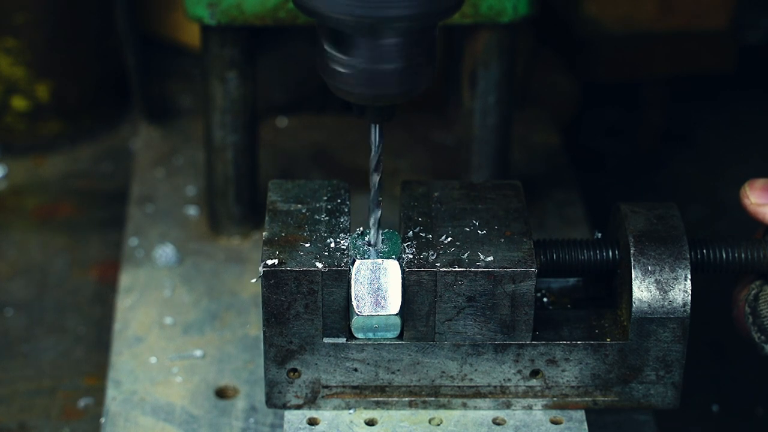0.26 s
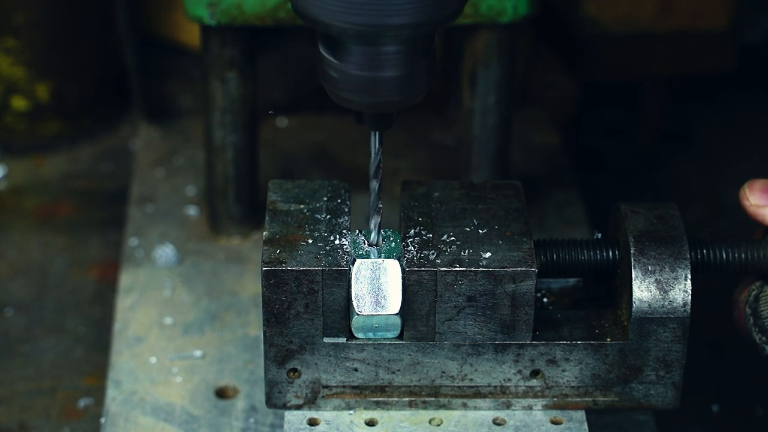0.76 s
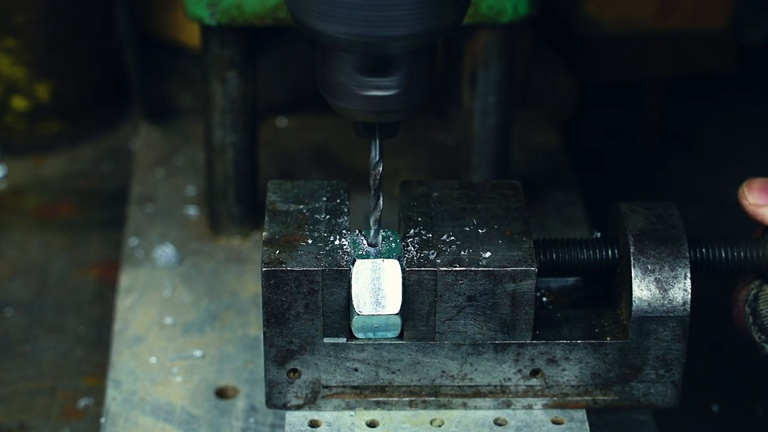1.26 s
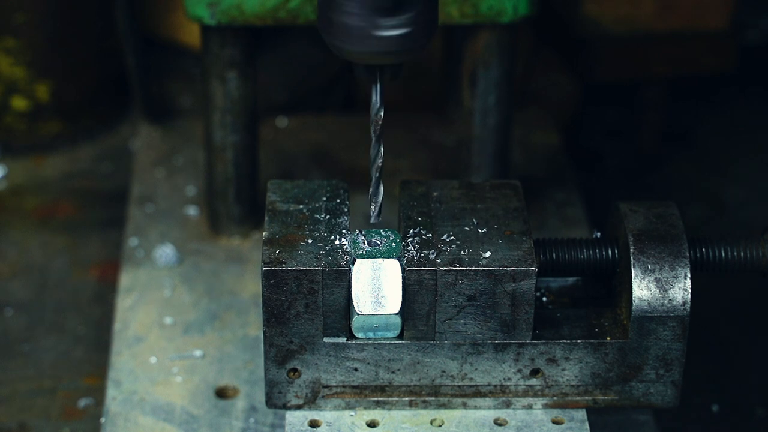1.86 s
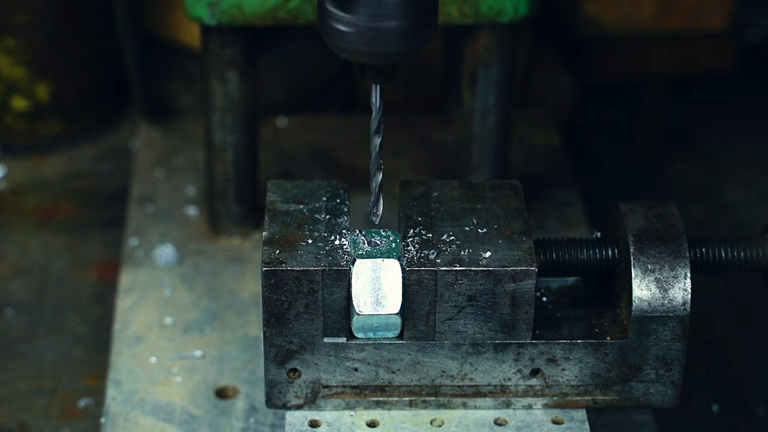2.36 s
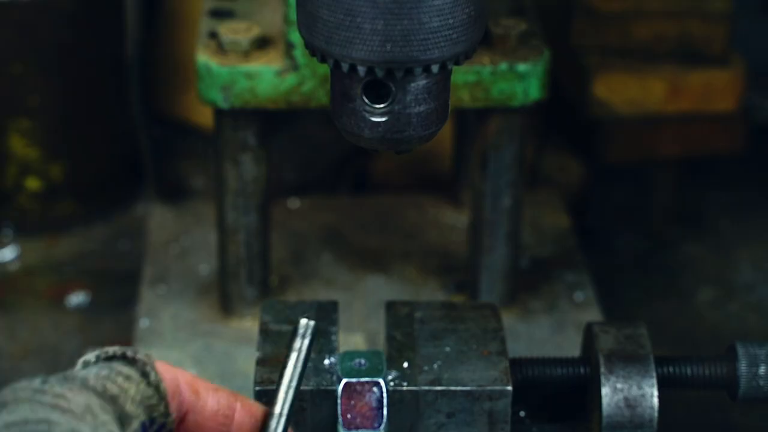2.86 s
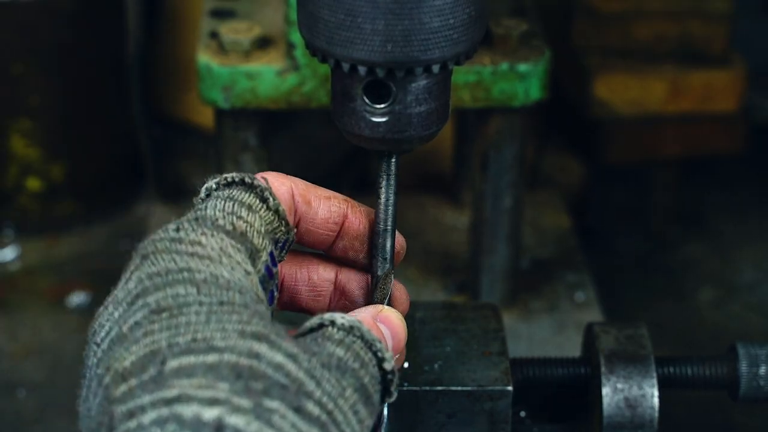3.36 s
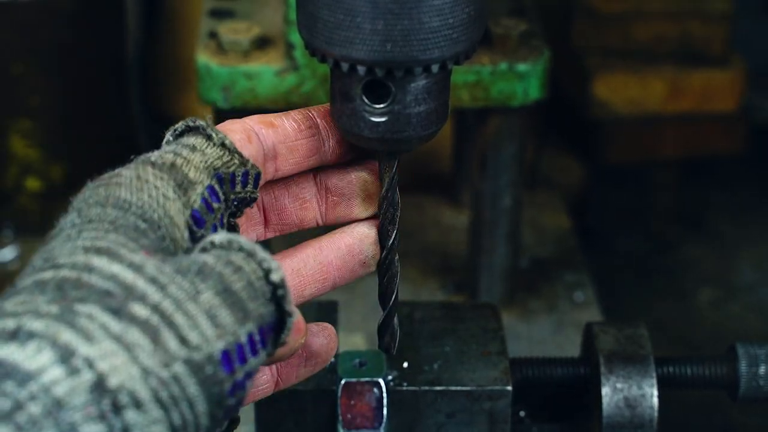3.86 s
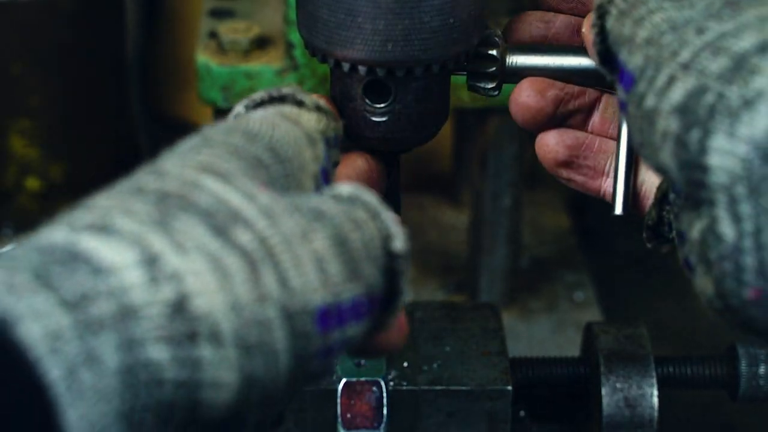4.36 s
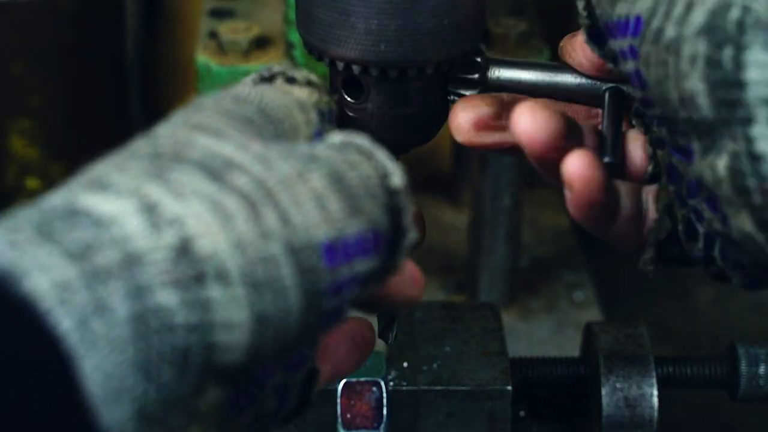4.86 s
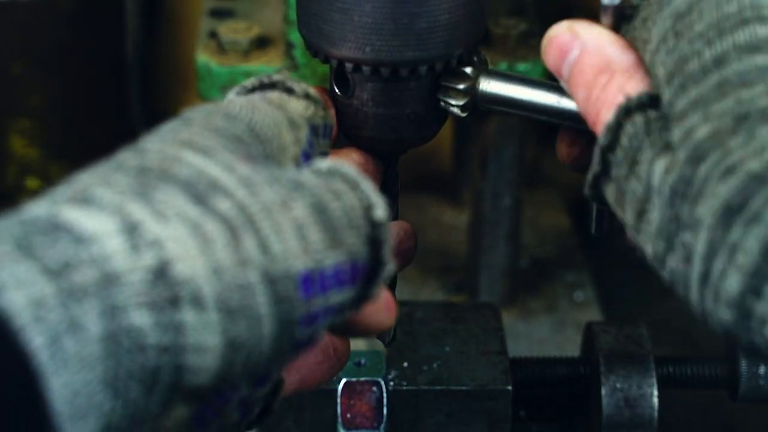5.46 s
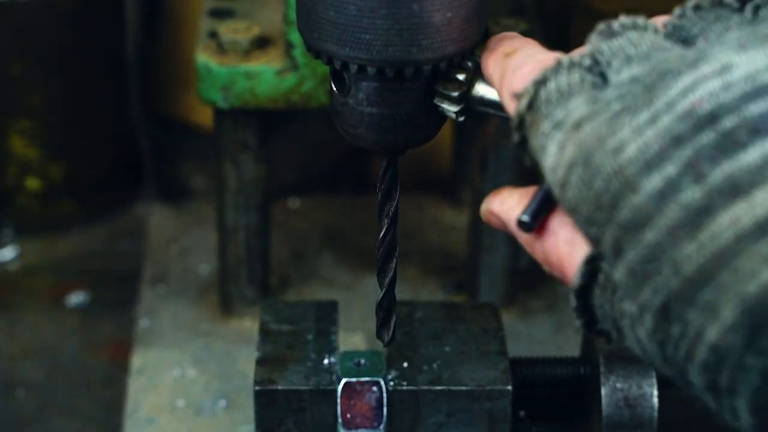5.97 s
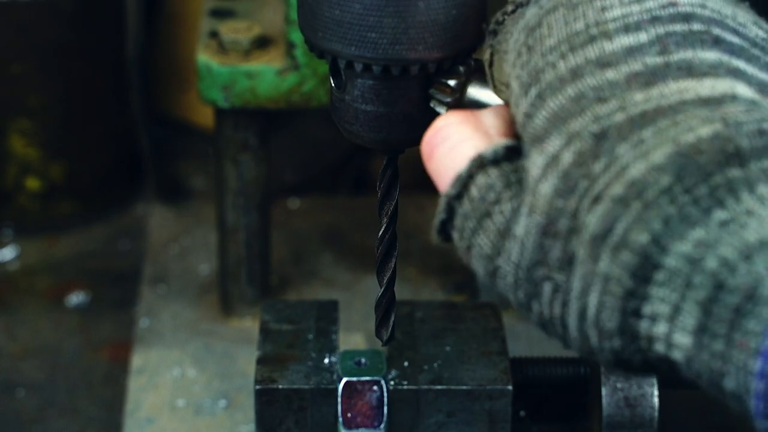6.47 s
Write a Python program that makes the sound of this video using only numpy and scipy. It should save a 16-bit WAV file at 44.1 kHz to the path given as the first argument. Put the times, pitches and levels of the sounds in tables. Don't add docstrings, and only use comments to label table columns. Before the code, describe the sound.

A drill press grinds harshly through a steel nut, chattering and squeaking, then cuts off abruptly to quiet metal ticks, scrapes and key clinks.

```python
import sys
import numpy as np
from scipy import signal
from scipy.fft import rfft, irfft, next_fast_len
from scipy.io import wavfile
from scipy.ndimage import uniform_filter1d, map_coordinates

SR = 44100
rng = np.random.default_rng(int(sys.argv[2]) if len(sys.argv) > 2 else 0)


def to_wav(sig):
    pcm = np.clip(np.atleast_2d(sig), -1, 1) * 32767
    pcm = np.round(pcm).astype(np.int16)
    wavfile.write(sys.argv[1], SR, pcm.T)


def ratio(d):
    e = np.asarray(d, float) / 20
    return 10 ** e


N = 295896
TIME = np.arange(N) / SR
SCENE_CHANGE = 2.7723
RUNNING = int(2.8 * SR)
TURNS, FIRST_TURN = 37.93, 0.387
BITE_START, BITE_END = 0.24, 0.73
BREAK_THROUGH, CLEAR = 0.755, 1.707

# (frequency [Hz], level per Hz [dB])
COLUMN_BITING = [(24, -73), (40, -67), (287, -18.5), (413, -10.5), (503, -16), (586, -3), (758, -6.5),
                 (1040, 2), (1500, -1.5), (1950, -7.5), (3300, -120)]
VISE_BITING = [(880, -34), (1500, -5.5), (2730, -1.5), (3630, -5.5), (4310, -3), (5200, -4), (6760, -48),
               (11400, -120)]
BIT_BITING = [(5290, -42), (9000, -24), (9660, -4), (11400, 2), (12800, 0), (13600, 9), (14100, 11),
              (15800, -6.5)]
# (frequency [Hz], level per Hz [dB])
VISE_BACKING = [(880, -34), (1500, -6.5), (1820, -5), (2060, -6.5), (3170, 1.5), (4050, -2.5), (5200, -5),
                (6760, -51), (11400, -120)]
BIT_BACKING = [(5290, -59), (9000, -10.5), (9660, -5.5), (10900, -4.5), (12800, -3.5), (13700, -3),
               (14300, 2.5), (14900, -0.5), (15800, -26)]
# (frequency [Hz], level per Hz [dB])
COLUMN_FREE = [(24, -81), (40, -80), (319, -16), (355, -20.5), (439, -14.5), (527, -14), (622, -2),
               (770, -7), (1210, 2.5), (1500, -1.5), (1950, -32), (3300, -120)]
VISE_FREE = [(880, -30), (1500, -4), (2330, 1), (2660, 2), (3190, -2), (5200, 0), (6760, -11.5),
             (11400, -120)]
QUILL = [(3060, -55), (5200, -6.5), (5730, 1), (6050, 0), (7090, -2.5), (9000, -9.5), (11700, -18.5),
         (19800, -120)]
BIT_FREE = [(7000, -42), (9300, -3), (12900, -4), (14000, -3), (14500, -1.5), (15800, -6.5)]
# (frequency [Hz], width [Hz], boost [dB])
RESONANCES = [(189.6, 21, 12.5), (418, 13, 16), (461, 14, 16), (603, 350, 2.5), (1302, 49, 6.5),
              (1738, 120, 10.5), (2330, 140, 10), (3087, 104, 8.5), (3285, 88, 10), (3980, 65, 10.5),
              (4180, 75, 2.5), (4570, 220, 10), (5650, 45, 4.5), (5920, 114, 9), (6100, 53, 7.5),
              (6600, 49, 5), (6440, 40, 2.5), (7640, 100, 2), (7900, 42, 8.5), (8800, 78, 10),
              (10700, 360, 5.5), (11900, 120, 4), (14400, 220, 8)]
# (frequency [Hz], level [dB])
MOTOR = [(199.2, -71), (414.5, -65), (452.2, -75), (625, -60), (683.7, -48)]
# (time [s], loudness [dB])
FEED = [
    (0, -21),
    (.33, -21.5),
    (.72, -21.5),
    (1.04, -20),
    (1.4, -22.5),
    (1.44, -22.5),
    (2.24, -18.5),
    (2.76, -21.5),
]
# (column [dB], vise [dB], quill [dB], bit [dB])
BITING_DB = [-9.5, -4, -4, -4.5]
BACKING_DB = [-14.5, -5.5, -5.5, -4]
FREE_DB = [-14.5, -4, -5.5, -7.5]
# (column [dB], vise [dB], quill [dB], bit [dB])
RUBBING_DB = [-1.4, -0.054, -1.8, 1]
# (time [s], half length [s], column boost [dB], vise boost [dB])
SURGES = [
    (0.022, 0.022, 1, 3),
    (0.14, .04, 2, 1),
    (0.209, 0.016, 6, 3),
    (0.344, 0.042, 5.5, 5),
    (0.504, 0.021, 3, 3.5),
    (0.63, .05, 2.5, 1),
    (0.726, 0.051, 4, 3.5),
]
# (start [s], end [s], level [dB], lag [s])
RUBS = [
    (0.785, 1.079, -12, .004),
    (1.24, 1.415, -11, .001),
]
# (first pitch [Hz], last pitch [Hz], level [dB])
RUB_VOICES = [
    (6500, 7200, 1.5),
    (3900, 4100, 0),
    (10800, 11300, -4),
]
QUARTERS_DB = [-13, 0, -1, -5]
# (time [s], peak level [dB])
KNOCKS = [(0.3067, -12), (0.3204, -16), (0.3331, -12), (0.3464, -17), (0.3735, -14), (0.386, -11),
          (0.3994, -18), (0.4125, -13), (0.4254, -19), (0.4389, -14), (0.4529, -13), (0.4654, -13),
          (0.4793, -16), (0.4914, -14), (0.5057, -12), (0.5184, -12), (0.5317, -13), (0.5434, -12),
          (0.5574, -18), (0.5696, -11), (0.5834, -18), (0.5965, -10), (0.6094, -15), (0.623, -11),
          (0.6354, -16), (0.6489, -13), (0.6614, -12), (0.6759, -11), (0.6884, -14), (0.7014, -12),
          (0.7144, -14)]
# (time [s], peak level [dB], pitch [Hz])
SQUEAKS = [(0.7581, -4, 10700), (0.8116, -3, 14400), (0.837, -7, 13900), (0.862, -12, 14400),
           (0.892, -4, 12900), (0.9208, -8, 14400), (1.061, -9, 14400), (1.1214, -5, 14100),
           (1.226, -10, 11100), (1.247, -8, 14400), (1.665, -10, 14360), (2.1635, -8, 14700),
           (2.4319, -7, 14600), (2.6499, -7, 14800)]
# (time [s], peak level [dB], pitch [Hz])
CHIPS = [(0.057, -8.5, 1710), (0.3212, -12, 2380), (0.455, -8, 2800), (0.493, -7, 3200), (0.5072, -4, 3070),
         (.5816, -18, 3060), (.845, -8, 2800), (.9283, -17, 3070), (1.033, -19, 3320), (1.117, -5, 3020),
         (2.6933, -13, 3300), (1.398, -11, 3820), (1.576, -8, 2990), (1.613, -6.5, 3110),
         (1.6633, -6.5, 3200), (2.108, -12, 2330), (2.286, -2.5, 3100), (2.3432, -5, 3870),
         (2.38, -4.5, 4180), (2.432, -5, 3200), (2.4663, -14, 2530), (2.6484, -6, 2330)]
# (time [s], peak level [dB], pitch [Hz])
THUDS = [
    (1.6652, -24.5, 1244),
    (1.8376, -19, 1207),
    (2.107, -22.5, 1245),
    (2.2358, -21.5, 1275),
    (2.3442, -21, 1205),
]
# (time [s], half length [s], level [dB], pitch [Hz], width [Hz])
DIGS = [
    (.04, .035, -25.5, 1670, 900),
    (.2, 0.026, -26, 2520, 1500),
    (.335, 0.017, -23.5, 2220, 900),
    (.735, 0.035, -24.5, 3020, 900),
    (.96, 0.052, -30, 4070, 500),
    (1.0, .06, -31, 14000, 1200),
    (1.27, 0.043, -35, 14300, 1200),
    (1.34, 0.075, -31, 11000, 1500),
]
# (frequency [Hz], likeness [-1 to 1])
DRILLING_ALIKE = [(60, 0.78), (180, 1.0), (550, 1), (1650, 0.85), (4970, 0.44), (9000, 0.3), (15000, 0.21)]
ROOM_ALIKE = [(60, 1), (240, 1), (950, 0.36), (3770, -0.17), (15000, -0.063)]
# (frequency [Hz], left over right [dB])
LEAN = [(60, -2), (180, 3), (550, 0), (1650, -1.5), (4970, -0.5), (9000, 1), (12000, -3), (15000, -6.5)]

# (frequency [Hz], level [dB], time to fall 60 dB [s])
CHUCK = [(2310, -2, 0.064), (2436, 3, 0.031), (2870, -4, 0.033), (2833, -0.5, 0.037), (3560, -24, .04)]
JAWS = [(4420, -11, 0.034), (4600, 14, 0.025), (5550, -24, 0.031), (6900, -22, 0.044), (7050, 5, 0.095)]
SHANK = [(9400, 0, 0.044), (11000, -8, .04), (14400, 4, 0.05)]
HEAD = [(850, -9, 0.023), (1108, 7.5, 0.077), (1403, 18, 0.062), (1690, 8, 0.078)]
# (frequency [Hz], level [dB], time to fall 60 dB [s])
LOADED_HEAD = [(800, 3, 0.067), (1050, 10, 0.046), (1590, 6, 0.045), (1960, 2, .03), (2440, -5, .04),
               (3200, 6, 0.039)]
# (time [s], edge level [dB], chuck level [dB], edge pitch [Hz])
BIT_TICKS = [(3.0833, -27, -39.5, 8900), (3.166, -40, -34, 8150), (3.1752, -26, -32.5, 9440),
             (3.2259, -12, -37, 8870), (3.37, -17.5, -30, 8870), (3.51, -34, -37.5, 9870),
             (3.544, -35, -39, 14700), (3.561, -31, -38, 8270), (3.5749, -20, -36, 14900),
             (3.6066, -19, -40, 14500), (3.616, -17.5, -37, 9500), (3.6545, -15, -46, 10600),
             (3.661, -20, -44, 9400)]
KEY_TICKS = [(4.224, -26.5, -68, 12600), (4.281, -32, -65, 12500), (4.333, -12, -25, 8000),
             (4.379, -52, -35, 12200), (4.3982, -29, -35, 8800), (4.405, -13, -30, 9400),
             (4.4093, -6, -38, 9400), (4.539, -20, -22.5, 8560), (4.5432, -33, -35, 7900),
             (4.6116, -25, -24, 14400), (4.6908, -31.5, -29.5, 11000), (4.7771, -23, -21.5, 7040),
             (4.8145, -39, -34, 8000), (4.8503, -49, -32, 14400), (4.899, -43, -42, 11000)]
TURN_TICKS = [(5.0964, -52, -46, 11100), (5.1394, -43, -38, 8780), (5.217, -52, -38, 14500),
              (5.247, -50, -38, 14000), (5.41, -52, -36, 14100), (5.6496, -36, -82, 13800),
              (5.7566, -45, -43, 14600), (5.785, -44, -48, 8200), (5.7995, -41, -37.5, 7990),
              (5.853, -37, -50, 8500), (5.863, -32, -71, 10700), (5.9772, -45, -40, 11300),
              (6.1335, -39, -51, 11800), (6.1625, -36, -37, 8000)]
# (bit [dB], key [dB], turning key [dB])
JAW_DB = (-13.5, 0.1, 6)
HEAD_DB = (-28.5, -23.5, -21)
# (bit [dB], key [dB], turning key [dB])
FOCUS_DB = (7, 9, 2)
EDGE_TILT_DB = (7, -17, 1)
# (per dB of edge [dB], per dB of chuck [dB])
JAW_FOLLOWS = (0.8, 0.43)
HEAD_FOLLOWS = (0.65, 0.25)
# (time [s], peak level [dB], pitch [Hz], life [s])
CLINKS = [(3.2259, -8, 11500, .00012), (3.237, -30, 2500, .001), (3.3692, -20, 9500, .0002),
          (4.918, -38, 6500, .0005), (5.233, -36, 2600, .002), (5.265, -38, 2700, .002),
          (5.417, -36, 2600, .0015), (5.464, -44, 2200, .002), (5.786, -40, 3800, .001),
          (5.8633, -36, 5500, .0003), (4.291, -33, 750, .0015), (3.1755, -28, 6000, .0002),
          (4.334, -17, 4600, .002), (4.7774, -9, 2820, .0015), (5.2182, -23, 2700, .002),
          (5.4101, -32, 2400, .002), (4.6122, -20, 2900, .001), (4.2258, -27, 12500, .0005),
          (5.6498, -31, 13500, .0004), (5.7575, -30, 2900, .002), (5.8538, -23, 3200, .0002),
          (5.8539, -30, 9000, .0002)]
# (time [s], level [dB])
HEAVES = [
    (5.14, -42.5),
    (5.802, -28.5),
    (5.9767, -31.5),
    (6.133, -39),
    (6.1616, -27),
    (6.2947, -42),
    (6.641, -39.5),
]
# (start [s], end [s], first level [dB], last level [dB], edge over chuck [dB])
SLIDES = [(3.202, 3.216, -61, -51, -23), (3.505, 3.603, -45.5, -48, -5.5), (3.598, 3.633, -43, -45, 7),
          (3.641, 3.667, -47, -41, 8), (3.676, 3.7, -44, -48, -3), (3.908, 3.95, -52.5, -57, 6),
          (4.229, 4.272, -43, -61, 1), (4.367, 4.385, -48, -52, -18), (4.852, 4.936, -57, -53, 2),
          (5.145, 5.272, -60, -51.5, -2), (5.744, 5.81, -60, -53, -3), (5.94, 5.973, -68, -44, -12)]
# (time [s], half length [s], level [dB], pitch [Hz], width [Hz])
PUFFS = [
    (3.21, 0.023, -45, 2500, 600),
    (4.355, 0.0064, -36, 2300, 250),
    (4.385, .012, -43, 2480, 500),
    (3.58, .04, -46, 14500, 900),
    (5.23, .03, -55, 14500, 800),
    (5.53, .04, -55, 14500, 900),
    (5.74, 0.023, -55, 14500, 800),
    (6.11, .03, -53, 14500, 800),
]
# (time [s], half length [s], level [dB], pitch [Hz], width [Hz])
BOOMS = [(3.194, .018, -71, 420, 120), (3.258, 0.034, -61.5, 424, 120), (3.392, .012, -76, 420, 150),
         (3.617, 0.023, -61, 566, 80), (3.62, 0.05, -67, 394, 140), (3.693, 0.0395, -64, 420, 130),
         (3.528, .03, -52, 1040, 150), (3.66, 0.017, -45.5, 1080, 160), (4.352, 0.016, -61, 422, 120),
         (4.437, 0.038, -59, 424, 150), (4.58, 0.038, -63, 420, 140), (4.71, 0.015, -61, 414, 110),
         (4.852, 0.064, -73, 423, 140), (5.2, .04, -68, 447, 250), (5.831, .035, -70, 420, 110),
         (6.199, .025, -68, 380, 150)]

# (frequency [Hz], time to fall 60 dB [s])
SHOP = [(300, 0.21), (2500, 0.14), (9000, 0.13), (15000, 0.08)]
# (frequency [Hz], level per Hz [dB])
HUM = [(24, -79), (40, -49), (107, -27), (145, -57), (180, -31), (230, -48), (409, -27), (609, -14),
       (681, -17.5), (879, -4), (1150, -3.5), (1270, -4), (1800, -11.5), (2340, -37), (3960, -120)]
AIR = [(1060, -57), (1800, -3), (2070, -5), (2270, -2.5), (7000, -6), (9100, -58), (15400, -120)]
RUSTLE = [(4120, -64), (7000, -10), (7750, -3), (9190, -4), (11700, -1.5), (15800, -6)]
# (time [s], level [dB])
STIR = [
    (2.85, -51),
    (3.35, -55),
    (4.3, -44),
    (4.65, -52),
    (5.7, -54.5),
    (6.0, -45.5),
    (6.35, -54.5),
    (6.7, -58),
]
# (level [dB], gain per dB of glove stir [dB])
ROOM_TONE = [
    (-59.5, 0.46),
    (-56.5, 0.64),
    (-54, 0.76),
]


def unit(x):
    return x / np.sqrt(np.mean(x ** 2) + 1e-20)


def along(points, hz):
    f, v = np.transpose(points)
    return np.interp(np.log(hz + 1), np.log(f + 1), v)


def curves(rows, outside=None):
    s, *columns = np.transpose(rows)
    return [np.interp(TIME, s, column, outside, outside) for column in columns]


def wobble(rate, size=N):
    knots = rng.standard_normal(int(N * rate / SR) + 4)
    sparse_time = TIME[:size + 8:8]
    return np.interp(TIME[:size], sparse_time, map_coordinates(knots, [sparse_time * rate]))


def span(t, start, end):
    return np.clip(np.minimum(t - start, end - t) / 0.079 + 0.5, 0, 1)


def filtered(x, response):
    m = next_fast_len(x.shape[-1] + 8192)
    shaped = rfft(x, m) * response(np.fft.rfftfreq(m, 1 / SR))
    return irfft(shaped, m)[..., :x.shape[-1]]


def rush(colour_db, alike, grit_db, grit_rate, size=N, snaps=0):
    pair = rng.standard_normal((2, size)) * ratio(grit_db * wobble(grit_rate, size))
    pair[:, rng.integers(0, size, int(size * snaps / SR))] *= 3.5

    def colour(hz):
        turn = np.arccos(np.clip(along(alike, hz), -1, 1)) / 2
        return ratio(colour_db(hz)) * np.array([np.cos(turn), np.sin(turn)])

    mid, side = filtered(pair, colour)
    return unit(np.array([mid + side, mid - side]))


def add(track, s, sound):
    part = track[..., max(round(s * SR), 0):][..., :sound.shape[-1]]
    part += sound[..., :part.shape[-1]]


def ring(modes, crack, t, detune=0.012):
    hz, db, t60 = np.transpose(modes)[..., None]
    strength = ratio(db + rng.normal(0, 2.5, hz.shape) - 60 * t / t60)
    pitch = hz * rng.normal(1, detune, hz.shape)
    tones = np.sum(strength * np.sin(2 * np.pi * pitch * t), 0)
    f = np.fft.rfftfreq(len(t), 1 / SR)
    band = 1 / (1 + (0.92 * hz.min() / (f + 1)) ** 8 + (f / (1.02 * hz.max())) ** 8)
    noise = irfft(rfft(rng.standard_normal(len(t))) * band, len(t))
    fade = ratio(-60 * t / 0.051) + 3 * ratio(-60 * t / 0.005)
    contact = 1 - np.exp(-t * hz.min() * 2.0)
    x = (tones + crack * fade * unit(noise)) * contact
    return x / np.abs(x).max()


def blip(hz, life, fall):
    t = np.arange(int(6 * life * SR)) / SR
    phase = 2 * np.pi * hz * (t - fall * t * t / life) + rng.normal(0, 0.16, (2, 1))
    return (1 - np.exp(-9 * t / life)) * np.exp(-t / life) * np.sin(phase)


def machine():
    t = TIME[:RUNNING]

    def part(spectrum, grit_db, rate, ringing):
        def colour(hz):
            boost = sum(db / (1 + (2 * (hz - c) / w) ** 2) for c, w, db in RESONANCES)
            return along(spectrum, hz) + ringing * boost
        return rush(colour, DRILLING_ALIKE, grit_db, rate, RUNNING, snaps=500)

    deep = np.clip((CLEAR - t) / 0.33, 0, 1)
    free = np.clip((t - BREAK_THROUGH) / 0.051, 0, 1)
    held = span(t, BITE_START, BITE_END)
    biting, through = np.sqrt(1 - free), np.sqrt(free)
    inside, outside = np.sqrt(deep), np.sqrt(1 - deep)
    angle = 2 * np.pi * TURNS * (t - FIRST_TURN)
    load = (0.27 + 1.37 * deep) * wobble(24.48, RUNNING) + 0.5 * np.cos(angle + 0.48)
    throb = deep * (1.7 * np.cos(angle + 1.0) + 0.6 * np.cos(2 * angle + 0.99))

    column = biting * part(COLUMN_BITING, 1.1, 90.8, 0.7)
    column += through * part(COLUMN_FREE, 2.5, 90, 0.53)
    vise = biting * part(VISE_BITING, 0.5, 250, 0.26)
    vise += through * outside * part(VISE_FREE, 0.7, 250, 0.98)
    vise += through * inside * part(VISE_BACKING, 1.9, 250, 0.62)
    quill = np.sqrt(1 - held) * part(QUILL, 0.96, 300, 1.07)
    quill += np.sqrt(held) * part(QUILL, 2.5, 280, 0.21)
    bit = biting * part(BIT_BITING, 2.8, 300, 0.42)
    bit += through * inside * part(BIT_BACKING, 3.1, 300, 0.66)
    bit += outside * part(BIT_FREE, 0.97, 300, 0.98)

    column_db, vise_db, quill_db, bit_db = part_levels(t, free, deep)
    out = ratio(column_db + load) * column + ratio(vise_db + 1.26 + load) * vise
    out += ratio(quill_db + 2.5 + 0.53 * load) * quill
    out += ratio(bit_db - 0.76 + load + throb) * bit
    for hz, db in MOTOR:
        strength = ratio(db - 0.5 + 1.3 * wobble(6.7, RUNNING))
        out += strength * np.sin(2 * np.pi * hz * t + 0.38 * wobble(4.7, RUNNING))
    return np.pad(out, ((0, 0), (0, N - RUNNING)))


def part_levels(t, free, deep):
    rubbing = sum(span(t, start, end) for start, end, *_ in RUBS)
    stage = np.outer(BITING_DB, 1 - free)
    stage += np.outer(BACKING_DB, free * deep) + np.outer(FREE_DB, free * (1 - deep))
    stage[2] -= 2 * span(t, BITE_START, BITE_END)
    for s, half, *db in SURGES:
        stage[:2] += np.outer(db, np.exp(-((t - s) / half) ** 2))
    stage[2] += rubbing * np.cos(2 * np.pi * (TURNS * (t - FIRST_TURN) - 0.46))
    return curves(FEED)[0][:len(t)] + stage + np.outer(RUBBING_DB, rubbing)


def chatter():
    out = np.zeros((2, N))
    for s, db in KNOCKS:
        for bend_hz in (4180, 4470):
            blow = blip(bend_hz * rng.normal(1, 0.015), life=0.0016, fall=0.02)
            add(out, s + 0.0011, ratio(db) * blow)
    quarter_rate = 4 * TURNS
    for start, end, db, lag in RUBS:
        first, last = (int((s - FIRST_TURN) * quarter_rate) for s in (start, end))
        for first_hz, last_hz, own_db in RUB_VOICES:
            for k in range(first, last):
                s = FIRST_TURN + k / quarter_rate + lag + rng.normal(0, 0.0006)
                hz = np.interp(s, [start, end], [first_hz, last_hz]) * rng.normal(1, 0.04)
                size_db = np.clip(rng.normal(0, 2), -5, 2)
                level = ratio(db + own_db + QUARTERS_DB[k % 4] + size_db)
                add(out, s, level * blip(hz, life=0.00098, fall=0.0064))
    return out


def swarf():
    out = np.zeros((2, N))
    t = np.arange(SR // 20) / SR
    for s, db, hz in SQUEAKS:
        modes = [(0.79 * hz, -5, 0.025), (0.97 * hz, -2, 0.02), (hz, 0, 0.025), (1.03 * hz, -2, 0.02)]
        add(out, s, ratio(db - 6) * ring(modes, 0.2, t) * np.minimum(t / 0.002, 1))
    for s, db, hz in CHIPS:
        modes = [(0.7 * hz, -3, 0.03), (hz, 0, 0.035), (1.07 * hz, -3, 0.03),
                 (1.33 * hz, -2, 0.03), (1.45 * hz, -4, 0.03), (2.1 * hz, -6, 0.025)]
        add(out, s, ratio(db - 3.5) * ring(modes, 0.42, t))
    for s, db, hz in THUDS:
        add(out, s, ratio(db + 2.0) * blip(hz, life=0.0089, fall=0.0018))
    return filtered(out, lambda hz: 1 / (1 + (520 / (hz + 1)) ** 8))


def flares(rows):
    out = np.zeros((2, N))
    for s, half, db, hz, width_hz in rows:
        t = np.arange(int(6 * half * SR)) / SR - 3 * half
        colour = lambda f: -40 * np.log10(1 + (2 * (f - hz) / width_hz) ** 2)
        band = rush(colour, DRILLING_ALIKE, 2.2, 205, len(t))
        swell = ratio(db) * np.exp(-(t / half) ** 2) * band
        add(out, s + t[0], swell[:, t + s >= 0])
    return out


def ticks():
    out = np.zeros(N)
    t = np.arange(5120) / SR
    jaws = [(c, db, 0.6 * t60) for c, db, t60 in JAWS]
    stages = zip((BIT_TICKS, KEY_TICKS, TURN_TICKS), JAW_DB, HEAD_DB, FOCUS_DB, EDGE_TILT_DB)
    for rows, jaw_db, head_db, focus_db, tilt_db in stages:
        for s, edge_db, chuck_db, hz in rows:
            cluster = [(hz, 0.5, 0.051)]
            for c in rng.uniform(7600, 15700, size=44):
                db = tilt_db * np.log2(c / 9000) - focus_db * abs(np.log(c / hz)) / 0.12
                cluster.append((c, db, 0.029))
            contact = (edge_db, chuck_db)
            head_level = ratio(head_db + 2.0 + np.dot(HEAD_FOLLOWS, contact))
            jaw_level = ratio(jaw_db + 8.0 + np.dot(JAW_FOLLOWS, contact))
            add(out, s, head_level * ring(HEAD, 0.85, t, detune=0.039))
            add(out, s, ratio(chuck_db + 5.5) * ring(CHUCK, 1.0, t[:4096], detune=0.024))
            add(out, s, jaw_level * ring(jaws, 2.2, t[:4096], detune=0.067))
            add(out, s, ratio(edge_db + 0.5) * ring(cluster, 0.92, t[:2048]))
    for s, db, hz, life in CLINKS:
        add(out, s, ratio(db) * blip(hz, life, fall=0.0027)[0])
    rise = 0.005
    for s, db in HEAVES:
        heave = ring(LOADED_HEAD, 2.5, t, detune=0.026)
        add(out, s - rise, ratio(db) * heave * np.minimum(t / rise, 1))
    return signal.sosfilt(signal.butter(6, 340, "high", fs=SR, output="sos"), out)


def slides():
    def scrape(modes, width_hz, alike, grit_db, grit_rate):
        def colour(f):
            peaks = sum(1 / (1 + (2 * (f - c) / width_hz) ** 2) ** 2 for c, _, _ in modes)
            return 10 * np.log10(1e-9 + peaks)
        return rush(colour, alike, grit_db, grit_rate, size=N - RUNNING)

    head = scrape(HEAD, 620, [(1000, 0.97)], 6.0, 41)
    chuck = scrape(CHUCK[:4], 560, [(2000, 0.8)], 2.2, 110)
    bright = scrape(JAWS[1:] + SHANK, 2200, [(9000, 0.5)], 2.5, 250)
    levels = np.zeros((3, N))
    for start, end, first, last, edge_db in SLIDES:
        stroke = ratio(curves([(start, first), (end, last)], -120)[0])
        balance = ratio([[-6.5 - max(edge_db, 0)], [0], [edge_db]])
        levels += uniform_filter1d(stroke, size=500) * balance
    head_level, chuck_level, bright_level = levels[:, RUNNING:]
    out = ratio(0.5) * head_level * head + ratio(-0.5) * chuck_level * chuck
    out += ratio(0.5) * bright_level * bright
    out = filtered(out, lambda hz: 1 / (1 + (420 / (hz + 1)) ** 8))
    return np.pad(out, ((0, 0), (RUNNING, 0)))


def shop(x):
    hz, t, z = signal.stft(rng.standard_normal((2, SR // 2)), SR, nperseg=256)
    fade = ratio(-60 * t / along(SHOP, hz)[:, None])
    tail = signal.istft(z * fade, SR, nperseg=256)[1]
    tail /= np.linalg.norm(tail[0])
    late = np.pad(x, (60, 0))[None]
    return signal.fftconvolve(late, tail, axes=1)[:, :N]


def floor():
    stir = curves(STIR)[0] + 55
    out = np.zeros((2, N))
    layers = zip(ROOM_TONE, (HUM, AIR, RUSTLE), (1.2, 0.8, 0.6), (40, 60, 80))
    for (db, gain), spectrum, grit_db, rate in layers:
        noise = rush(lambda hz: along(spectrum, hz), ROOM_ALIKE, grit_db, rate)
        out += ratio(db + gain * stir) * noise
    return out


def scene():
    drilling = machine() + chatter() + swarf() + flares(DIGS)
    drilling = filtered(drilling, lambda hz: ratio(np.outer([0.5, -0.5], along(LEAN, hz))))
    before = np.clip((SCENE_CHANGE - TIME) / 0.0008 + 0.5, 0, 1)
    steel = ticks()
    hands = steel * ratio([[-0.4], [0.4]]) + ratio(-5.0) * shop(steel) + slides()
    return drilling * before + hands + flares(PUFFS + BOOMS) + floor()


def band_limit(x):
    return signal.sosfilt(signal.butter(12, 16480, fs=SR, output="sos"), x)


def record(dry):
    bass = lambda hz: 0.26 + 0.72 / (1 + (130 / (hz + 1)) ** 4)
    top = lambda hz: np.where(hz < 15850, 1, ratio(-36))
    mix = filtered(dry, lambda hz: bass(hz) * top(hz))
    return band_limit(mix)


dry = scene()
out = record(dry)
to_wav(out)
```